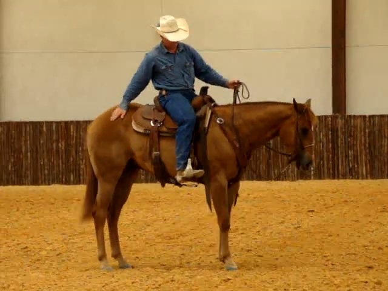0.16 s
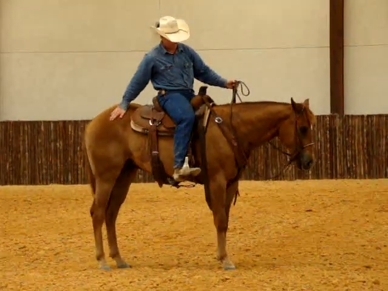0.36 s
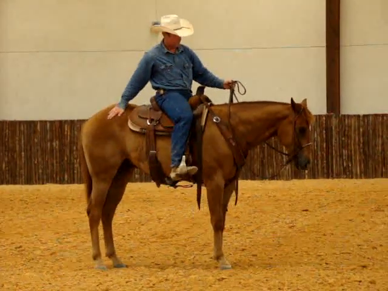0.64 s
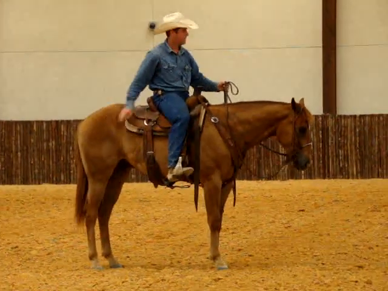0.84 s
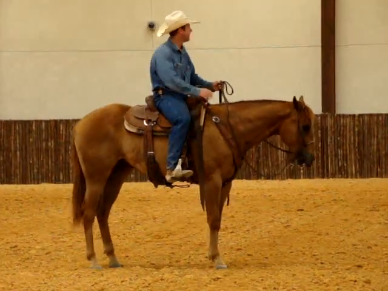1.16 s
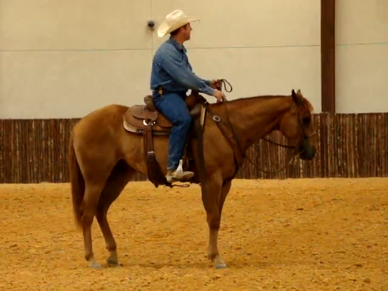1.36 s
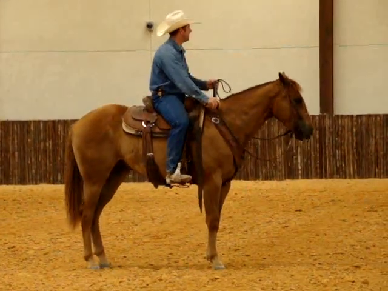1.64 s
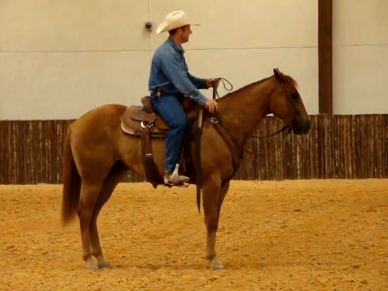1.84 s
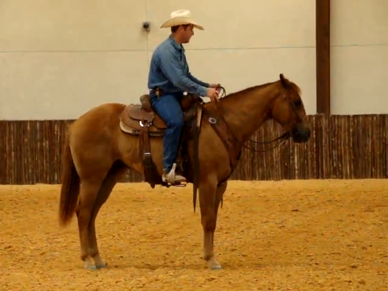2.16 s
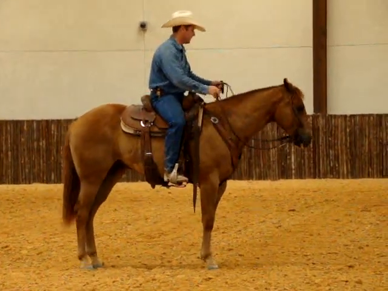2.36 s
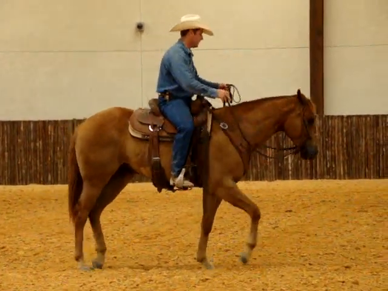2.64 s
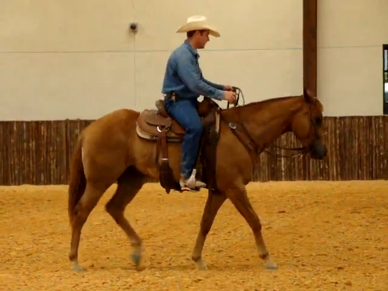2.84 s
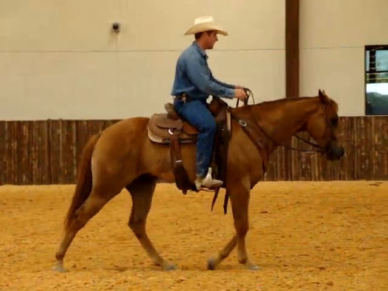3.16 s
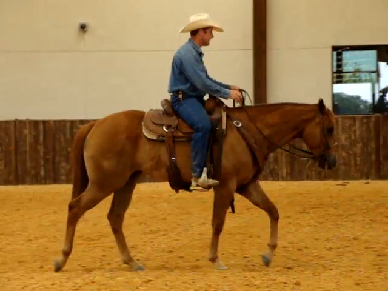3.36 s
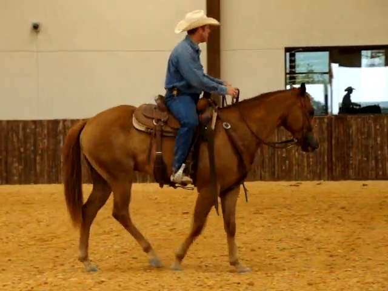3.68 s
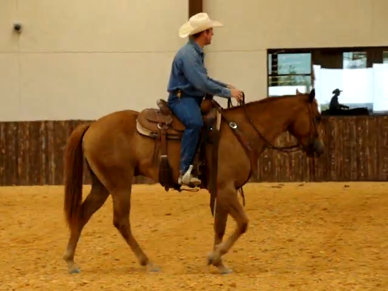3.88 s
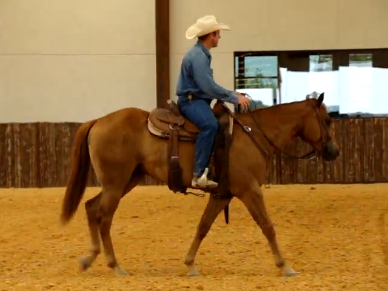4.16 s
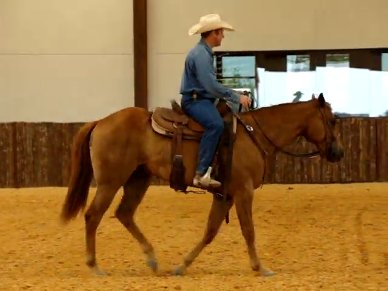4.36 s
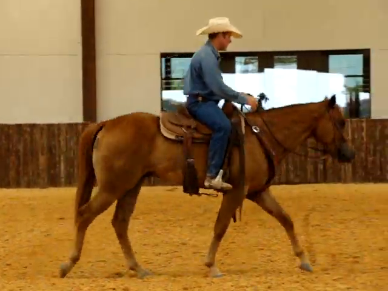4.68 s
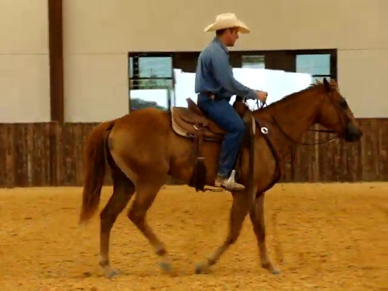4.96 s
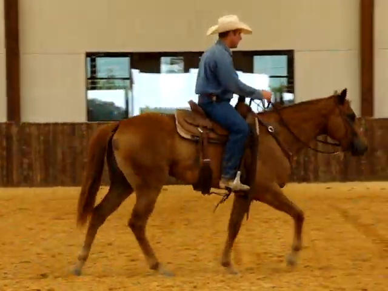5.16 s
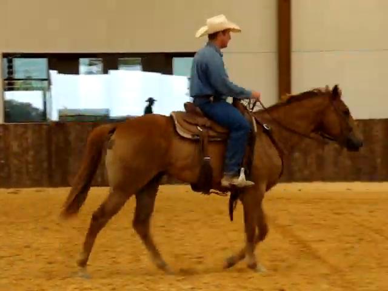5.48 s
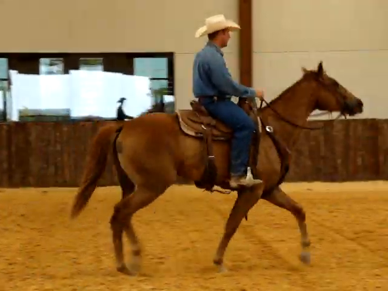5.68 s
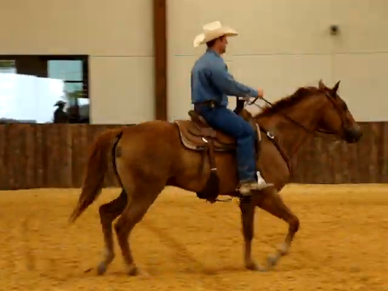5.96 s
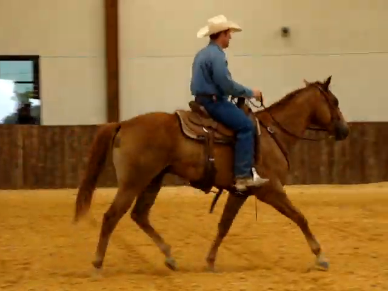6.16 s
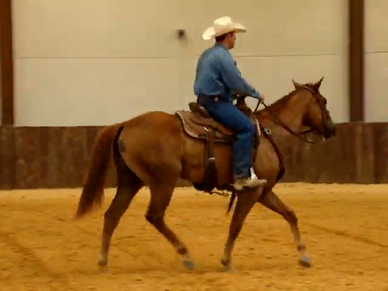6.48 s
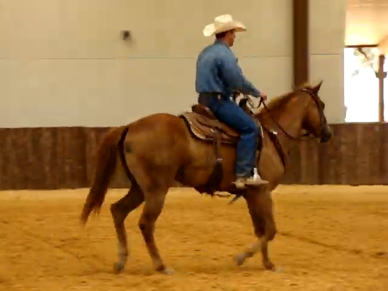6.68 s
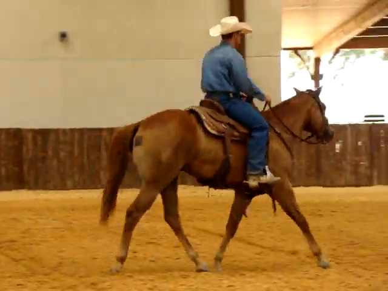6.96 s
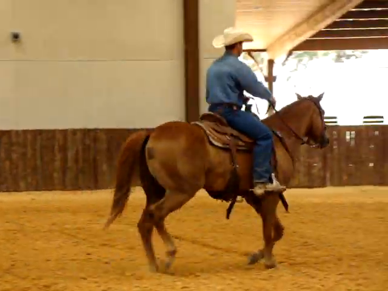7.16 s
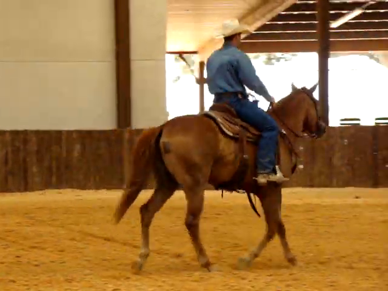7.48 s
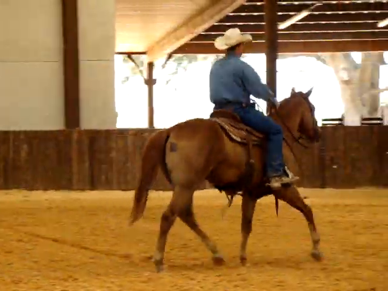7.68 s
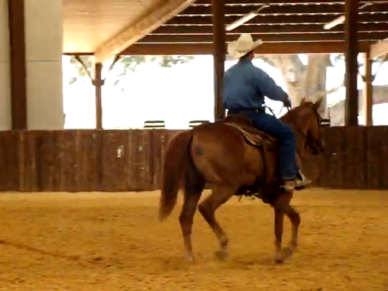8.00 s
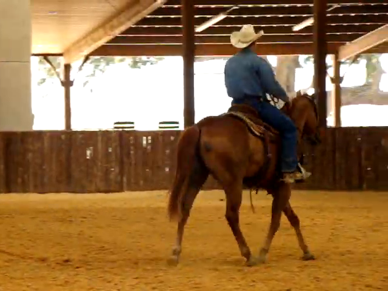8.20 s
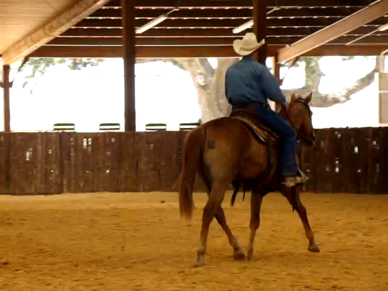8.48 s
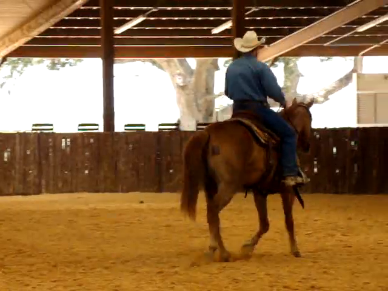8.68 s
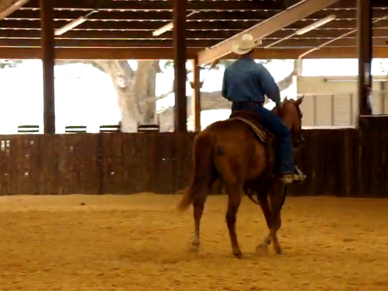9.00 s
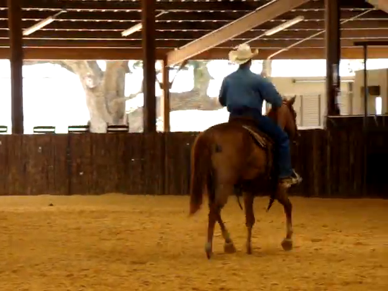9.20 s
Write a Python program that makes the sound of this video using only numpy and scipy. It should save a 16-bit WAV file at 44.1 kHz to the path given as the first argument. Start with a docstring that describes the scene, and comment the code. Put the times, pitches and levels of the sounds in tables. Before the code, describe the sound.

High, ringing sparrow chirps repeat overhead in a reverberant riding hall with quiet room noise and a barely audible fan. Right at the start, three quick, close slaps of a palm on a horse stand out as the loudest sounds. The horse then moves off quietly: leather and stirrups knock now and then, bit and spurs tick lightly, and in the second half hooves softly scuff the sand.

```python
"""A roofed riding arena with a sand floor, heard in mono. Close to the microphone a rider pats his
horse three times with a flat hand, then walks it off: tack knocks and ticks, hooves scuff the sand.
Up in the rafters sparrows whistle two-voiced chirps, each smeared into a jingle by the hall.
Far away a fan hums faintly under the room tone."""
import sys
import numpy as np
from scipy import signal
from scipy.fft import rfft, irfft, next_fast_len
from scipy.io import wavfile

SR = 44100
rng = np.random.default_rng(int(sys.argv[2]) if len(sys.argv) > 2 else 0)


def transcribe(u):
    """Save the signal u as a 16-bit wav file named by the first command-line argument.

    u: samples, shape (n,) or (channels, n), limited to [-1, 1]; the rate is SR.
    q: integer samples, one column per channel.
    """
    v = np.clip(np.atleast_2d(u).T, -1, 1)
    q = np.round(v * 32767).astype(np.int16)
    wavfile.write(sys.argv[1], SR, q)


N = 411894
TIME = np.arange(N) / SR
CHIRP_TIME = np.arange(-.1, .18, 1 / SR)   # s from a chirp's crest


def pats():
    """Close up, a palm claps trapped air on the rump; the ground echoes, then the hall answers."""
    # strokes of the hand: (time [s], gain [dB])
    strokes = [(0.2252, -9), (0.4877, -10), (0.745, -8)]
    # colour of a pat: (frequency [Hz], gain [dB])
    colour = [(120, -31), (300, -12.5), (520, 2), (800, -1.5), (1350, -1), (2200, 0), (3200, -5.5),
              (4500, -9), (7000, -15.5), (10000, -11.5)]
    out, t = np.zeros(N), TIME[:SR // 3] - .003
    for s, db in strokes:
        # the palm lands over a millisecond or two, with one main pressure swing
        clap = 0.29 * rng.standard_normal(len(t)) * np.exp(-np.abs(t) / 0.0017)
        for height, at_s, half_s in ((-0.45, -.00022, .00005), (0.36, 0, .00008), (-0.77, .00045, .000099)):
            clap += height * np.exp(-((t - at_s) / half_s) ** 2)
        # off the ground: a crisp echo and a dull scatter
        late = t - .0095
        echo = 0.58 * rng.standard_normal(len(t)) * np.exp(-np.abs(late) / 0.00057)
        scatter = 0.19 * band(rng.standard_normal(len(t)), 200, 4100) * np.exp(-np.abs(late) / 0.037)
        # the low part of the slap comes back later from the boards
        boom = 0.25 * band(rng.standard_normal(len(t)), 220, 590) * np.exp(-np.abs(t - .04) / 0.0079)
        add(out, s + t[0], from_db(db) * (clap + (echo + scatter + boom) * (late > 0)))
    out = coloured(out, colour)
    return out + from_db(-7.5) * heard(band(out, 150, 4100), hall_tail(gap_s=0.035, build_s=0.014))


def sparrows():
    """Chirps from the rafters; the birds turn as they call, so each finds its own paths to the mic."""
    # first syllable, an arch: (time from its crest [s], pitch [Hz], level [dB])
    arch = [(-.036, 3130, -19), (-.015, 3550, -8.5), (-.006, 4520, -7), (.002, 4850, -0.5),
            (.020, 4650, -10), (.030, 4467, -4), (.043, 3590, -2.5), (.054, 3300, -30)]
    # second syllable, a low hook: (time from the arch's crest [s], pitch [Hz], level [dB])
    hook = [(.070, 3200, -17.5), (.081, 3240, -3.5), (.096, 3436, -3.5), (.107, 3668, -4.5),
            (.117, 3924, -0.5), (.128, 3448, -5.5), (.142, 2852, -4)]
    # thin upper voice from the other side of the syrinx, leading in: columns as for the hook
    upper = [(-.074, 5980, -13.5), (-.050, 6050, 4.5), (-.030, 6200, -16.5), (-.012, 5760, -15.5),
             (.010, 5570, 4.5), (.035, 5600, -15), (.058, 5740, -7), (.095, 5900, -21), (.115, 5970, -30)]
    # calls: (crest time [s], rms level [dB], hook gain [dB], upper voice gain [dB], stretch [ratio])
    calls = [(-.08, -41, 1, -16.5, 0.98), (0.512, -41, -1.5, -18, 0.89), (.99, -44.5, -6.5, -13, 0.87),
             (1.299, -48.5, -2.5, -12.5, 0.65), (1.406, -47.5, -2, -19, 0.75), (1.493, -40, 4, -19, 0.63),
             (1.933, -38, -1, -18, 1.04), (2.295, -49.5, -7, -15, 0.82), (2.52, -43.5, -3, -13.5, 1),
             (3.012, -38, -1, -22.5, .95), (3.489, -43, -3.5, -13.5, .95), (3.9, -51.5, -3, -8, 0.64),
             (4.41, -45, -4, -16.5, 0.7), (4.56, -49, -9, -19, 0.93), (5.111, -39.5, 2, -22, 0.88),
             (5.518, -42, -4, -16.5, 0.75), (5.834, -54, -3, -12, 0.8), (6.222, -45, -4.5, -10.5, 1.05),
             (6.512, -51, -6.5, -12.5, 0.99), (7.365, -49, -7.5, -20, 0.82), (7.805, -38, -4.5, -23.5, .86),
             (8.106, -50.5, -4.5, -28, 0.76), (8.422, -42.5, 0, -18, .93), (8.69, -50.5, -1.5, -15, 1.19),
             (9.21, -43, -4, -19, 1)]
    # echoes off roof and walls: (delay [s], level [dB])
    echoes = [(0.014, -5), (0.032, -1.5), (.044, -14.5)]
    out, early = np.zeros(N), TIME[:SR // 10]
    usual_db = -45
    for s, level_db, hook_db, upper_db, stretch in calls:
        pitch = 1 + 0.00812 * rng.standard_normal()
        chirp = syllable(arch, pitch, stretch, waver=0.026, flutter_db=3.5, overtone_db=-20)
        chirp += from_db(hook_db) * syllable(hook, pitch, stretch, 0.0307, 2.5, overtone_db=-30)
        chirp += from_db(upper_db) * syllable(upper, pitch, stretch, 0.07, 3.0, overtone_db=-25.5)
        response = from_db(2.5) * hall_tail(gap_s=0.0033, build_s=0.024)
        # a bird facing the microphone is louder and clearer: more direct sound
        response[0] += from_db(-1.5 + 0.37 * (level_db - usual_db))
        # beams and roof panels break each early echo into a short cluster
        for delay, db in echoes:
            cluster = rng.standard_normal(len(early)) * np.exp(-np.abs(early - delay) / 0.0043)
            response[:len(early)] += from_db(db) * cluster / np.linalg.norm(cluster)
        smeared = signal.fftconvolve(chirp, response)
        add(out, s + CHIRP_TIME[0], from_db(level_db) * smeared / np.std(smeared[:len(chirp)]))
    return out


def syllable(shape, pitch, stretch, waver, flutter_db, overtone_db):
    """A whistled glide with a fast random tremble in pitch and level."""
    beak_hz, beak_width_hz = 9060, 520
    s, hz, db = np.transpose(shape)
    t, s = CHIRP_TIME, s * stretch
    hz = pitch * np.interp(t, s, hz) * (1 + waver * drift(600, len(t)))
    gain = from_db(np.interp(t, s, db) + flutter_db * drift(229.6, len(t)))
    fade = np.clip(np.minimum(t - s[0], s[-1] - t) / .002, 0, 1)
    phase = 2 * np.pi * np.cumsum(hz) / SR
    # overtones come through where they meet a resonance of throat and beak
    overtones = sum(np.sin(k * phase) / (1 + ((k * hz - beak_hz) / beak_width_hz) ** 2) for k in (2, 3))
    return fade * gain * (np.sin(phase) + from_db(overtone_db) * overtones)


def tack():
    """Dull knocks of leather and stirrups, brighter when the contact is hard, and tiny ticks of metal."""
    # saddle and stirrup knocks: (time [s], gain [dB], hardness as tilt [dB per octave])
    knocks = [(2.291, -35, -6.5), (3.428, -42, 9), (4.104, -50, 12), (4.733, -43, -5), (4.772, -47.5, 14),
              (6.068, -39, -1), (6.793, -44, 10), (8.156, -40, 1), (8.444, -44, 8)]
    # resonances of the saddle: (frequency [Hz], gain [dB])
    saddle_modes = [(506, -12.5), (960, -7.5), (1620, -3.5), (3000, -8.5)]
    # clear ticks of bit and spurs: (time [s])
    clear_ticks = [1.744, 4.731, 7.5092, 7.661, 8.369, 9.1254]
    pivot_hz, walk_start_s, faint_ticks_per_s = 1120, 2.5, 1.2
    out = np.zeros(N)
    for s, db, tilt_db in knocks:
        for hz, mode_db in saddle_modes:
            gain = from_db(db + mode_db + tilt_db * np.log2(hz / pivot_hz))
            add(out, s, gain * burst(hz / 1.12, hz * 1.24, decay_s=0.0049))
    faint_ticks = TIME[(rng.random(N) < faint_ticks_per_s / SR) & (TIME > walk_start_s)]
    for times, db in ((clear_ticks, -35.5), (faint_ticks, -43.5)):
        for s in times:
            add(out, s, from_db(db) * tick())
    return out


def tick():
    """Metal touches metal and rings for a moment."""
    # resonances of the metal: (frequency [Hz], level against the contact [dB])
    metal_modes = [(6200, -14), (9900, -13)]
    ring = sum(from_db(db) * burst(hz / 1.04, hz * 1.04, decay_s=0.006) for hz, db in metal_modes)
    return burst(4000, 10800, decay_s=0.0012) + ring


def hooves():
    """Hooves scuff the floor, each time in three quick swells of gritty, sliding sand."""
    # scuffs: (time [s], level [dB], band centre [Hz])
    scuffs = [(5.974, -56, 939), (6.2, -56, 1100), (6.715, -53, 470), (7.335, -52.5, 650),
              (7.808, -45.5, 1216), (8.545, -51, 1080), (9.135, -58, 736)]
    # the toe touches, the hoof slides, kicked sand falls: (delay [s], gain [dB], half length [s])
    phases = [(0, 2, 0.014), (.049, 2, 0.019), (0.094, -1.5, .034)]
    out, t = np.zeros(N), TIME[:SR // 2] - 1 / 4
    swells = sum(from_db(db) * np.exp(-((t - delay) / half_s) ** 2) for delay, db, half_s in phases)
    for s, db, hz in scuffs:
        grit = rng.standard_normal(len(t)) * from_db(4.0 * drift(246.8, len(t)))
        add(out, s + t[0], from_db(db) * rms_one(band(grit, hz / 1.86, hz * 1.73)) * swells)
    return out


def room_tone():
    """The steady noise of the hall's air."""
    # spectrum of the air: (frequency [Hz], relative density [dB])
    spectrum = [(18, -36.5), (30, -16.5), (79, -13), (117, -7), (164, -4), (237, -1.5), (341, 0.5),
                (626, 0), (798, -1.5), (901, -1), (3190, -8), (4270, -1.5), (4710, -5.5), (5860, -10),
                (10000, -15.5), (13000, -99), (22000, -120)]
    return from_db(-52.5) * rms_one(coloured(rng.standard_normal(N), spectrum))


def fan():
    """A fan far from the microphone hums in a few wavering tones."""
    # tones of the fan: (frequency [Hz], rms level [dB])
    tones = [(120, -81.5), (880, -70), (1348, -69.5), (1846, -83.5)]
    out = np.zeros(N)
    for hz, db in tones:
        wavering_hz = hz * (1 + 0.00843 * drift(40, N))
        out += from_db(db) * np.sqrt(2) * np.sin(2 * np.pi * np.cumsum(wavering_hz) / SR)
    return out


def hall_tail(gap_s, build_s):
    """The arena's diffuse response, of unit energy: it builds up after a gap and dies in about a second."""
    # decay of the hall: (frequency [Hz], time to fall 60 dB [s])
    decays = [(200, 1.0), (1000, 0.86), (3500, 0.76), (6000, 0.95), (10000, 0.88)]
    t = TIME[:2 ** 15]
    white, hz = rfft(rng.standard_normal(len(t))), np.fft.rfftfreq(len(t), 1 / SR)
    centres, t60s = np.transpose(decays)
    tail = np.zeros(len(t))
    for share, t60 in zip(np.eye(len(centres)), t60s):
        noise_band = irfft(white * np.interp(hz, centres, share))
        tail += noise_band * np.exp(-np.log(1000) * t / t60)
    tail *= 1 - np.exp(-np.maximum(t - gap_s, 0) / build_s)
    return tail / np.linalg.norm(tail)


def burst(low_hz, high_hz, decay_s):
    """A brief contact: dying noise in one band, peak 1."""
    t = TIME[:SR // 10]
    x = band(rng.standard_normal(len(t)) * np.exp(-t / decay_s), low_hz, high_hz)
    return x / np.abs(x).max()


def from_db(db):
    """Decibels to gain."""
    return 10 ** (np.asarray(db) / 20)


def rms_one(x):
    """Scale to rms 1."""
    return x / np.sqrt(np.mean(x ** 2) + 1e-20)


def coloured(x, spectrum):
    """Filter by a table of (frequency [Hz], gain [dB]), read on a log-frequency axis."""
    size = next_fast_len(len(x), True)
    hz, db = np.transpose(spectrum)
    bin_hz = np.maximum(np.fft.rfftfreq(size, 1 / SR), 1)
    gain = from_db(np.interp(np.log(bin_hz), np.log(hz), db))
    return irfft(rfft(x, size) * gain, size)[:len(x)]


def band(x, low_hz, high_hz):
    """Causal band-pass."""
    return signal.sosfilt(signal.butter(2, [low_hz, high_hz], "band", fs=SR, output="sos"), x)


def drift(rate_hz, size):
    """A smooth random wander with spread about 1."""
    return np.interp(np.arange(size) * rate_hz / SR, np.arange(size), rng.standard_normal(size))


def add(out, s, x):
    """Mix x into out from time s on."""
    i = round(s * SR)
    a, b = max(i, 0), min(i + len(x), N)
    if b > a:
        out[a:b] += x[a - i:b - i]


def heard(x, response):
    """Pass a sound through a response."""
    return signal.fftconvolve(x, response)[:N]


def scene():
    """Horse and birds from one spot in the hall, the same in both channels."""
    around = room_tone() + fan() + sparrows() + pats()
    horse = hooves() + tack()
    horse += from_db(-5.0) * heard(horse, hall_tail(gap_s=0.03, build_s=0.011))
    return np.tile(around + horse, (2, 1))


def record(dry):
    """The top of the treble is cut steeply."""
    cutoff_hz = 10200
    return signal.sosfilt(signal.ellip(12, .2, 70, cutoff_hz, fs=SR, output="sos"), dry)


dry = scene()
out = record(dry)
transcribe(out)
```